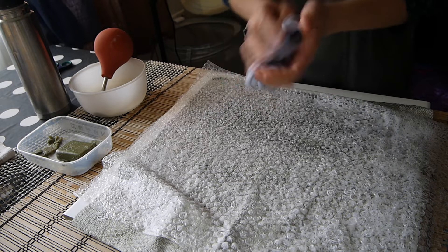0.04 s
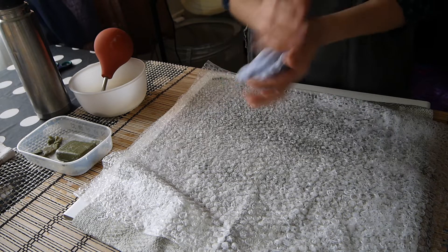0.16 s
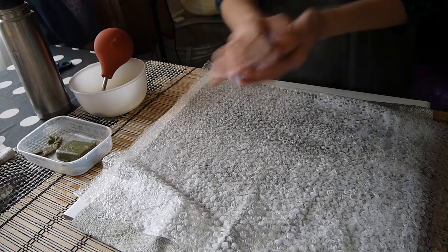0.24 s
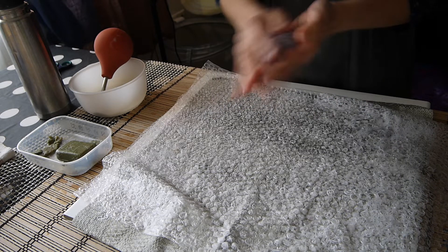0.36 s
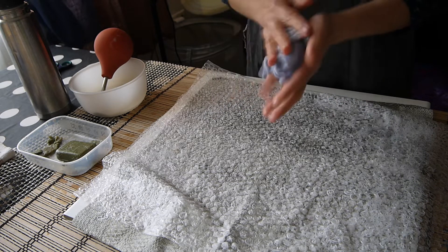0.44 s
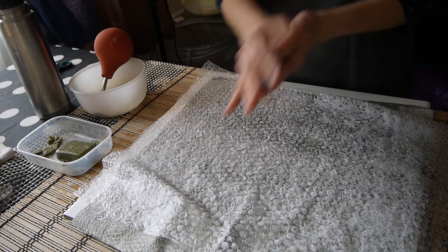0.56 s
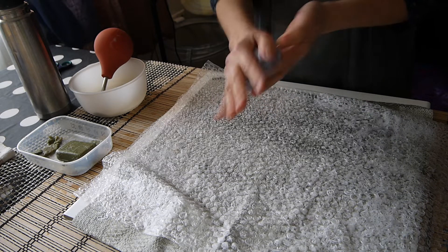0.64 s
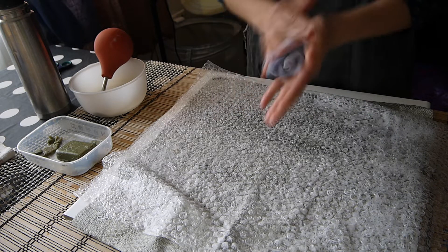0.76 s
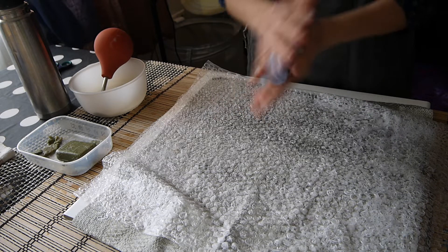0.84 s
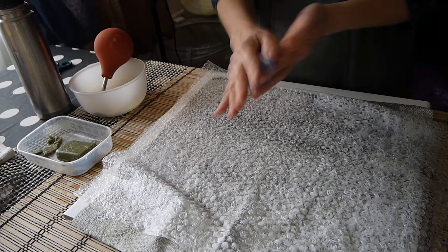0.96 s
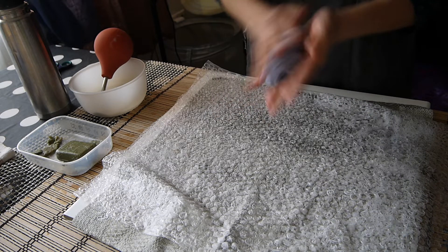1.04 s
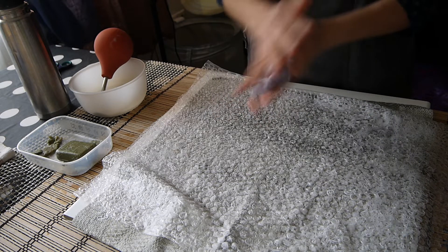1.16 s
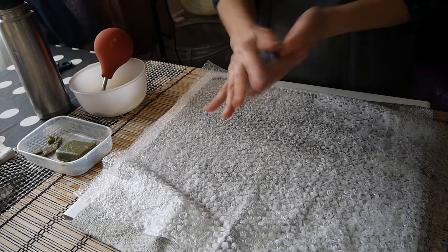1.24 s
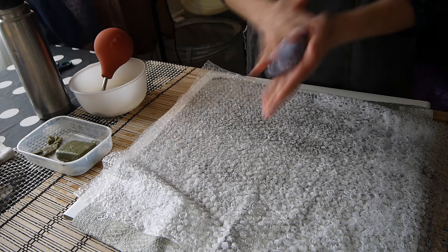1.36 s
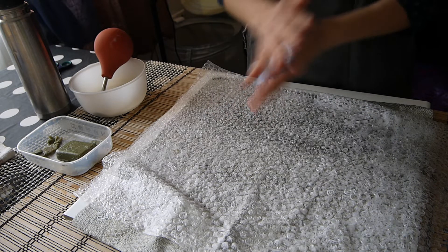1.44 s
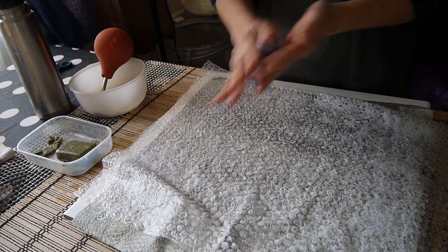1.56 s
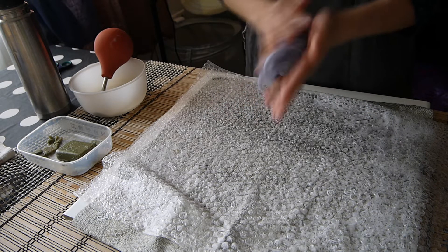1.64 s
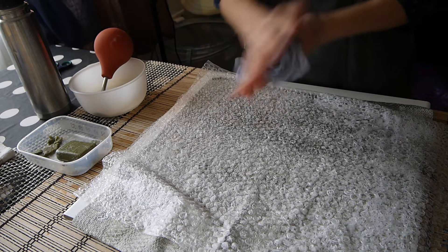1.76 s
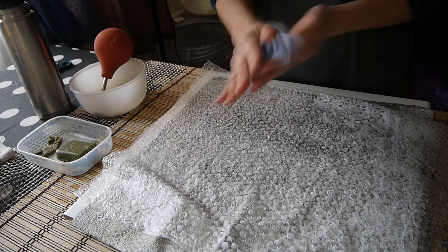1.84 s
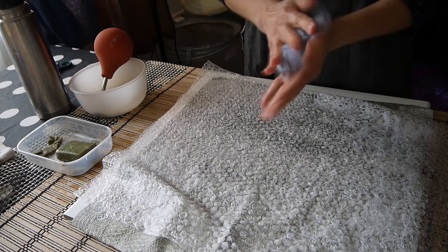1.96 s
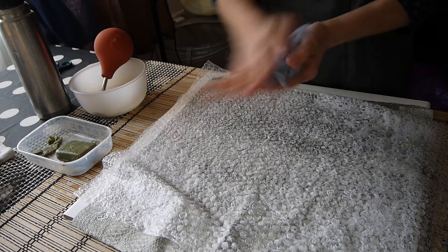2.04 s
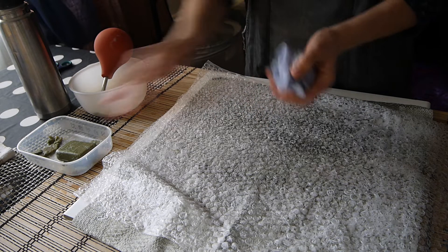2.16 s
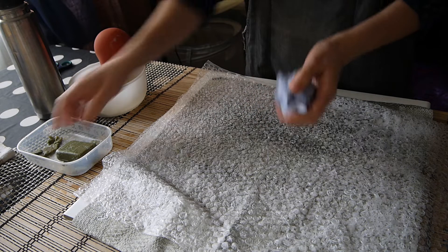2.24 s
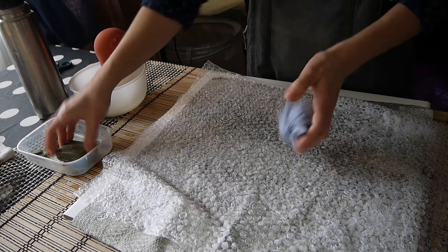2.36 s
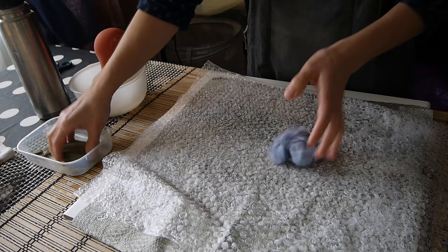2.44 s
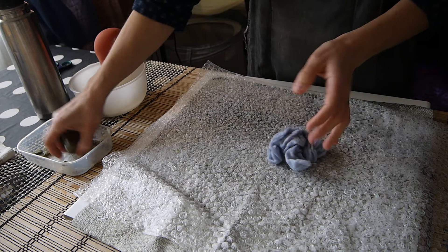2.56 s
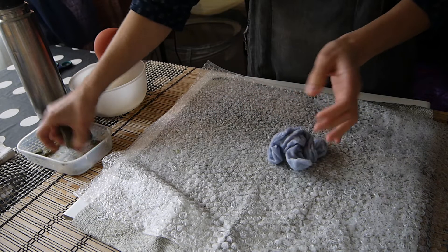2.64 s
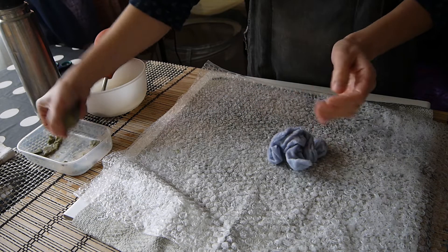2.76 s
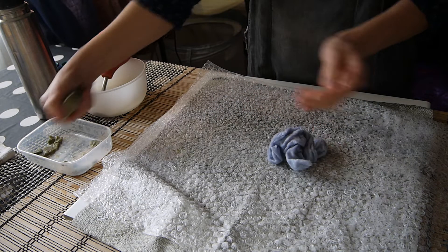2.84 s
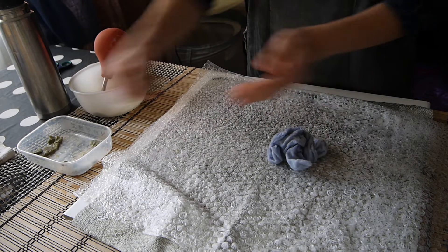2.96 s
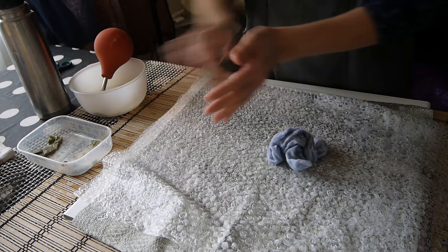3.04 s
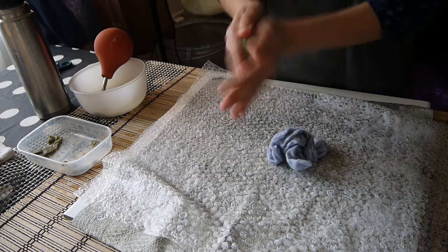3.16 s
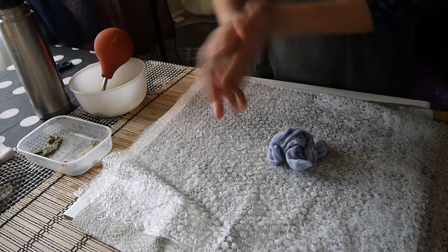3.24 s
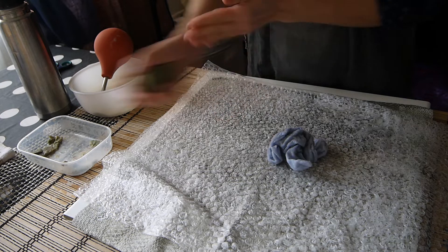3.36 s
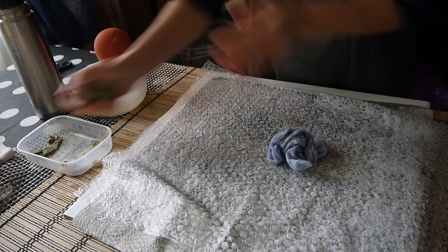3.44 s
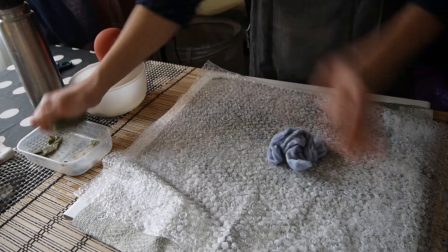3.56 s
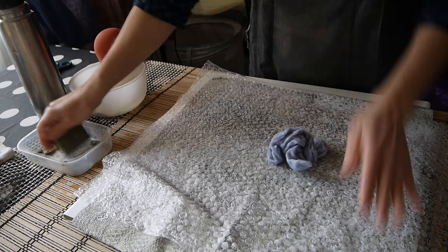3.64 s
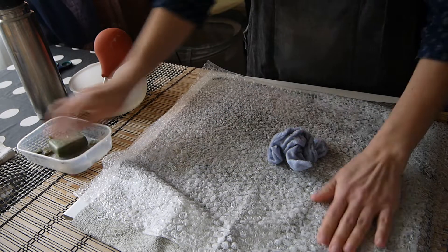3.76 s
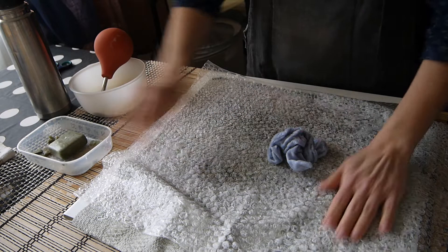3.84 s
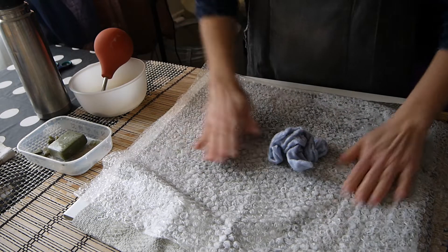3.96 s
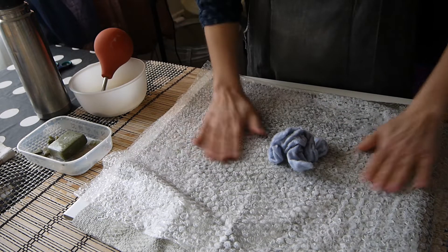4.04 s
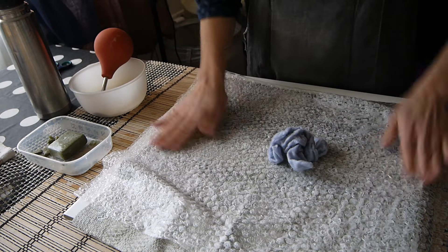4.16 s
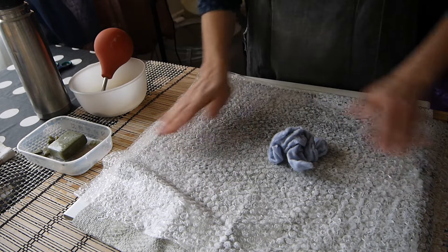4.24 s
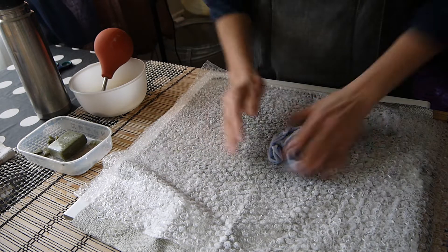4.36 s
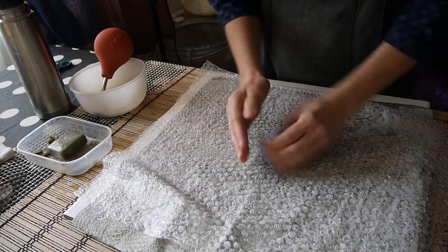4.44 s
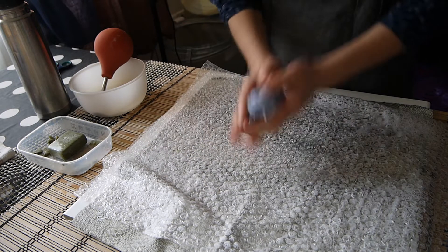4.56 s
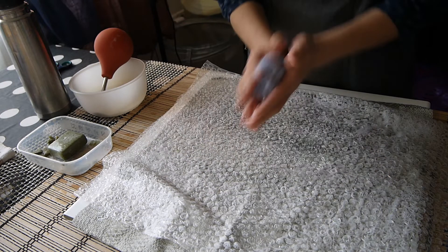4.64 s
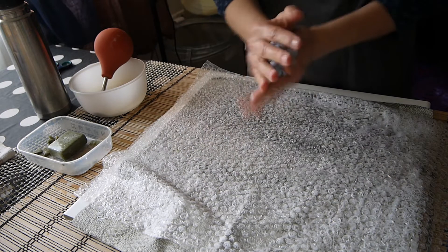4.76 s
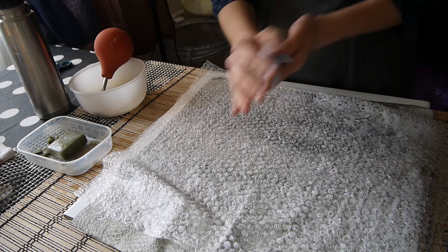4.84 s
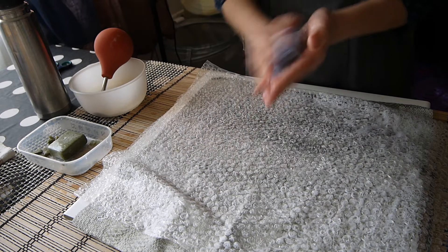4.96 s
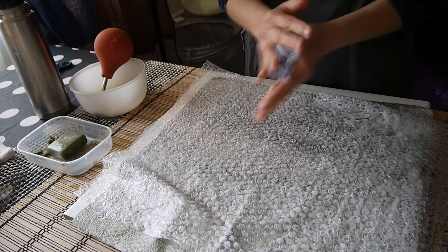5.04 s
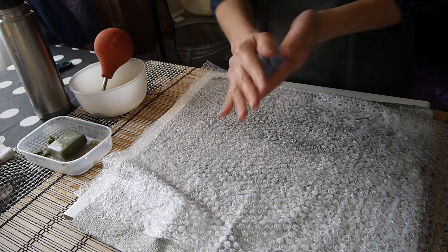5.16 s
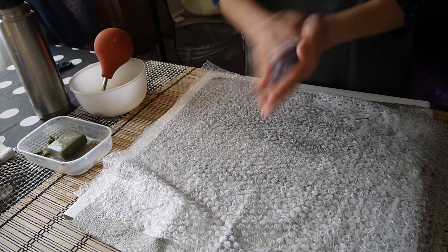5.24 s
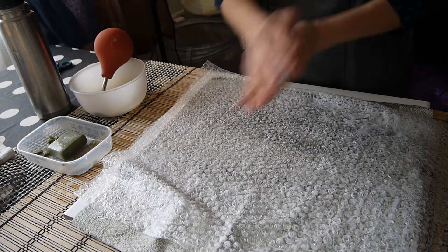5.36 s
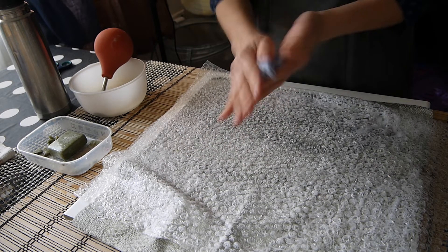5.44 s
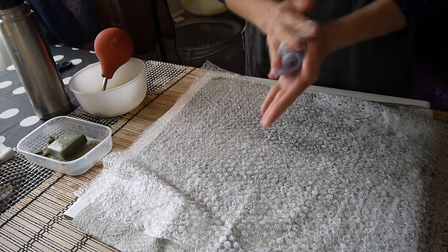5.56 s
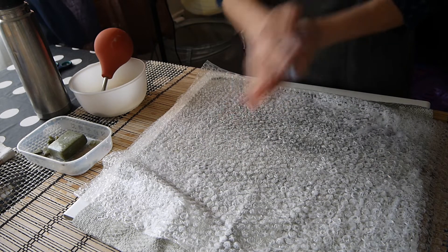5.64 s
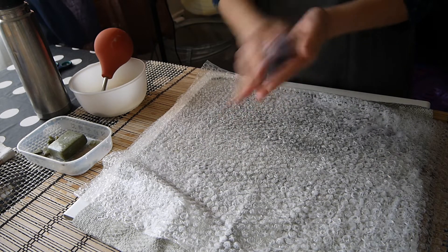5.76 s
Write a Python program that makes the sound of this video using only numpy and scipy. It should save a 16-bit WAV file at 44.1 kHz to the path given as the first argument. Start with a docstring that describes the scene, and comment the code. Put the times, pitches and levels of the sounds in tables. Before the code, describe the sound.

From the start until about 2.1 seconds, palms roll wet, soapy wool close by in the centre: a soft foamy hiss in about six strokes a second, with small squelches. A wet tap follows near 2.3 seconds. From 2.4 to 2.8, a bar of soap scrapes and knocks lightly in a plastic dish on the left. Quiet lathering with a few wet smacks runs from 3 to 3.6 seconds. At 3.7 the bar drops back with a sharp, bouncing clatter and low table thuds, by far the loudest event, over by 3.9. From 4 to 4.6 seconds, hands press and wipe bubble wrap, giving two brief crinkling swishes and soft bumps. The wool rubbing returns around 4.5 seconds, its strokes and squelches continuing to the end near 6 seconds. Steady microphone hiss and a faint distant rumble lie underneath, in a quiet room with little echo.

```python
"""Wet wool and a soap dish, close up

At a table in a quiet room, near a stereo pair of microphones, hands roll a soapy wool ball that hisses and
squelches, and put it on bubble wrap. They lift a bar of soap from a plastic dish on the left, lather, and
drop it back: the dish clatters and the table thuds. They press the wrap flat and take up the wool again.
Far room rumble and microphone hiss lie under everything."""
import sys
import numpy as np
from scipy import signal
from scipy.fft import rfft, irfft, next_fast_len
from scipy.io import wavfile

SR = 44100
rng = np.random.default_rng(int(sys.argv[2]) if len(sys.argv) > 2 else 0)


def bounce(signal):
    """Save signal as a 16-bit WAV file at the path given by the first command-line argument."""
    frames = np.transpose(np.atleast_2d(signal))
    limited = np.clip(frames, -1, 1)
    pcm = np.round(limited * 32767).astype(np.int16)
    wavfile.write(sys.argv[1], SR, pcm)


N = 255339

# palms roll the wool to and fro, one row a stroke: (middle [s], length [s], level [dB])
PALM_STROKES = [(0.0, 0.11, -56), (0.107, 0.17, -56), (.26, 0.13, -57.5), (0.424, 0.16, -54.5),
                (.6, 0.13, -55), (0.767, 0.19, -55.5), (0.907, 0.15, -55.5), (1.078, .18, -58),
                (1.225, 0.17, -57.5), (1.363, 0.26, -59.5), (1.504, 0.14, -54.5), (1.68, .13, -55.5),
                (1.84, 0.26, -55.5), (1.98, 0.12, -60), (2.102, 0.081, -59), (4.837, .24, -56),
                (5.027, 0.33, -58), (5.158, 0.16, -56.5), (5.283, 0.25, -58), (5.414, 0.14, -53),
                (5.568, 0.17, -55), (5.712, 0.19, -52.5)]
# wool between the palms keeps hissing at the turns: (start [s], end [s], closing time [s])
WOOL_HOLDS = [(-.1, 2.13, .02), (4.5, 7, 0.23)]
# two spells, lathering the bar and letting it slip: (time [s], level [dB])
LATHER_SPELLS = [
    [(2.97, -75), (2.98, -64), (3.082, -63.5), (3.09, -49), (3.182, -65), (3.208, -53), (3.37, -57),
     (3.4, -67), (3.635, -74)],
    [(3.636, -76), (3.642, -62), (3.69, -58)],
]
STROKE_SHARPNESS = 1.16   # power of the sliding speed that the hiss follows
HOLD_DB, PARTING_S = -58.5, 0.029


def sliding():
    """Gain of the hiss: sliding speed is half a sine in each stroke, over a steady contact."""
    t = np.arange(N) / SR
    power = gains(LATHER_SPELLS)[0] ** 2
    for s, length, db in PALM_STROKES:
        speed = np.cos(np.pi * np.clip((t - s) / length, -.5, .5))
        power += (from_db(db) * np.abs(speed) ** STROKE_SHARPNESS) ** 2
    for start, end, closing in WOOL_HOLDS:
        contact = np.interp(t, [start, start + closing, end, end + PARTING_S], [0, 1, 1, 0])
        power += (from_db(HOLD_DB) * contact) ** 2
    return np.sqrt(power)


# soapy hiss from close by: (frequency [Hz], relative density [dB])
FOAM_SPECTRUM = [(180, -86), (300, -8), (326, 2), (397, -9.5), (821, -9), (907, -12), (2980, -13.5),
                 (3600, -16), (4200, -12), (4950, -9.5), (6360, -13.5), (9930, -10.5), (11500, -15),
                 (15500, -38.5)]
# the hands across the two microphones: (frequency [Hz], left-right likeness [-1..1])
HAND_LIKENESS = [(300, 1), (3000, 0.78), (7000, 0.68), (15000, 0.66)]


def rubbing():
    """Centre, close: soap film shears with a hiss in which tiny foam bubbles pop."""
    foam = rng.standard_normal((2, N)) + 0.35 * grains(per_s=2500, spread_db=2.3, channels=2)
    return sliding() * wide(foam, FOAM_SPECTRUM, HAND_LIKENESS)


# wool squeezed between the palms: (middle [s], level [dB], pitch [Hz], length [s])
WOOL_SQUELCHES = [(0.104, -56, 1180, 0.026), (0.195, -55, 493, 0.035), (0.767, -55, 198, .05),
                  (1.228, -56, 1370, 0.074), (1.51, -52.5, 1770, 0.027), (1.754, -71, 158, 0.063),
                  (1.807, -50.5, 1190, 0.049), (2.08, -58, 720, 0.13), (4.851, -59, 1200, 0.051),
                  (5.045, -55.5, 900, 0.049), (5.173, -57, 510, 0.046), (5.408, -56.5, 810, 0.094),
                  (5.691, -56.5, 724, 0.09)]


def squelches():
    """Water and air pressed through wool: soft swells about two octaves wide."""
    out = np.zeros(N)
    for s, db, hz, length in WOOL_SQUELCHES:
        size = int(length * SR)
        band = filtered(rng.standard_normal(size), "band", [hz / 3.4, hz * 1.41])
        add(out, s - length / 2, from_db(db) * rms_one(band) * np.hanning(size))
    return out


# wet contacts in the centre: (time [s], peak [dB], band centre [Hz], t60 [s])
WET_SMACKS = [(2.26, -40, 570, 0.038), (2.26, -37, 4660, 0.011), (2.894, -44, 8300, 0.0079),
              (2.98, -56, 7000, .01), (3.09, -37, 493, 0.15), (3.089, -39, 9000, 0.015),
              (3.104, -41.5, 2970, .01), (3.21, -40.5, 4030, 0.009), (3.242, -41, 2540, 0.008),
              (3.644, -51, 3970, 0.017), (3.798, -32, 9400, .03), (3.865, -32, 9400, 0.014),
              (3.874, -32, 10000, .012), (3.885, -25, 9500, 0.012), (3.895, -26, 9500, 0.017),
              (4.43, -46.5, 680, 0.13), (4.501, -41, 5000, .02), (5.513, -42, 7000, .01),
              (5.677, -34, 8000, 0.02)]


def smacks():
    """Wet skin, wool and soap smack together, each a puff about an octave wide."""
    out = np.zeros(N)
    for s, db, hz, t60 in WET_SMACKS:
        add(out, s, from_db(db) * burst(t60, hz / 1.45, hz * 1.45))
    return out


# modes of the plastic dish: (frequency [Hz], relative level [dB], t60 [s])
DISH_MODES = [(368, -2.5, 0.029), (462, 7.5, 0.02), (657, -13, 0.042), (765, -7, 0.032), (1070, -6, 0.031),
              (888, -1, .055), (1122, 1, .06), (1350, 0, .05), (1620, -1, 0.02), (1780, -14, 0.022),
              (1930, -4.5, 0.041), (2007, -11.5, 0.033), (2129, -0.5, 0.026), (2355, -0.5, 0.022),
              (2650, 6.5, 0.0067), (3170, 13.5, 0.0054), (4110, 12.5, 0.0052), (4900, -17.5, 0.00367),
              (5900, -15, 0.0046)]
# bar on dish: (time [s], peak before panning [dB], contact t60 [s], favoured pitch [Hz], relative snap [dB])
BAR_KNOCKS = [(2.4215, -34, 0.003, 970, -14), (2.46, -39, 0.0034, 1500, -4),
              (2.475, -28.5, 0.0013, 1390, -9), (2.504, -34.5, 0.017, 1650, -7),
              (2.574, -40, 0.016, 1690, -7), (2.589, -31.5, .014, 1400, -8.5),
              (2.6729, -21, 0.0014, 1250, -9), (2.677, -23, 0.0054, 1500, -33),
              (2.697, -32.5, 0.042, 1150, -23), (2.709, -28, 0.014, 1400, -23),
              (2.735, -25, 0.019, 1500, -26), (3.6952, -2, .002, 2000, -4), (3.698, -7, 0.0027, 1800, -10),
              (3.71, -22, 0.0028, 1210, -13), (3.718, -34, 0.015, 900, -13),
              (3.7905, -8.5, 0.02, 1010, -21), (3.798, -8, 0.008, 1250, -13),
              (3.86, -18.5, 0.011, 1800, -7), (3.865, -8, 0.021, 2050, -20),
              (3.882, -23.5, 0.033, 1530, -8), (3.894, -17, 0.0043, 1620, -2)]


def knocks():
    """Each blow of the bar lands on another spot of the dish and favours other modes; a snap leads it."""
    out = np.zeros(N)
    for s, db, contact, hz, snap_db in BAR_KNOCKS:
        modes = [(f, level_db - 53 * np.log2(f / hz) ** 2 + rng.normal(0, 1.44), t60)
                 for f, level_db, t60 in DISH_MODES]
        force = burst(contact, 126, 4000)
        force[:3] += .8   # the first touch is the hardest
        body = cut_bass(ring(force, modes), 0.29 * hz)   # a small dish radiates no bass
        snap = from_db(snap_db) * burst(0.0072, 4250, 7400)
        add(out, s, from_db(db) * (peak_one(body) + snap))
    return out


# each jolt of bar and dish leaves a chatter until the next: (time [s], jolt [dB], chatter [dB],
# chatter fade [dB/s], relative wet treble [dB], further fade of the treble [dB/s])
BAR_JOLTS = [(2.42, -60, -50.5, 5, -13, 5), (2.45, -48, -47, 5, -10, 5), (2.473, -37, -44, 61, -11, 190),
             (2.578, -41, -40.5, 240, -12, 150), (2.672, -28.5, -37.5, 150, -32, 5),
             (2.733, -44, -37.5, 288, -25, 5), (3.698, -16.5, -28.5, 13, -8, 130),
             (3.792, -16.5, -25.5, 8, -9, 250), (3.865, -39, -23, 145, -7, 42)]
JOLT_HOLD_S, JOLT_FADE_DB_PER_S = .002, 1500


def chatter():
    """Gains of scrape and wet treble: a short jolt on a fading chatter; the treble dies sooner."""
    t, rows = np.arange(N) / SR, np.array(BAR_JOLTS)
    last = np.searchsorted(rows[:, 0], t) - 1
    s, jolt_db, chatter_db, fade, wet_db, wet_fade = rows[last].T
    age = np.abs(t - s)
    jolt = from_db(jolt_db - JOLT_FADE_DB_PER_S * np.maximum(age - JOLT_HOLD_S, 0))
    skid = (last >= 0) * np.hypot(jolt, from_db(chatter_db - fade * age))
    return skid, skid * from_db(wet_db - wet_fade * age)


# scrape of the held bar, of the loose bar, and their wet film: (frequency [Hz], relative density [dB])
HELD_SPECTRUM = [(180, -42), (300, -1.5), (775, 0), (896, -13), (1280, 2), (1380, 1), (1540, -6), (1750, 0),
                 (7000, -58), (9100, -65), (15400, -120)]
LOOSE_SPECTRUM = [(180, -10), (300, 7), (603, -34), (884, -1.5), (1600, 9), (1850, 4.5), (2970, -0.5),
                  (5170, -4), (7000, -14), (9100, -50), (15400, -120)]
SPRAY_SPECTRUM = [(1760, -24), (3000, -12.5), (5160, -6.5), (6700, -17.5), (9520, -9), (12300, -16.5),
                  (13800, -33), (15500, -45)]
# the dish across the two microphones: (frequency [Hz], left-right likeness [-1..1])
SCRAPE_LIKENESS = [(60, 0.76), (180, 1), (550, 1), (1650, 0.46), (4970, 1), (15000, 0.37)]
DROP_S = 3.3   # the bar scrapes as held before this, as loose after


def skidding():
    """The bar skids in dense contacts, partly ringing in the dish; the wet film adds treble."""
    skid, wet = chatter()
    held = np.arange(N) / SR < DROP_S
    contacts = grains(per_s=4000, spread_db=0.72, channels=2)
    soft_contacts = signal.lfilter([.3], [1, -.7], contacts[0])
    ringing = rms_one(filtered(ring(soft_contacts, DISH_MODES), "high", 510))
    gripped = filtered(ringing, "high", 950)   # a gripped dish loses its low modes
    body = np.where(held, 0.47 * gripped, .5 * ringing)
    scrape = np.where(held, wide(contacts, HELD_SPECTRUM, SCRAPE_LIKENESS),
                      wide(contacts, LOOSE_SPECTRUM, SCRAPE_LIKENESS))
    spray = wide(grains(per_s=4600, spread_db=2.6, channels=2), SPRAY_SPECTRUM, SCRAPE_LIKENESS)
    return skid * (body + 0.54 * scrape) + wet * spray


# two spells of pressing and wiping the bubble wrap: (time [s], crinkle [dB], relative table push [dB])
WRAP_PRESSES = [
    [(4.0, -49, -65), (4.022, -47, -65), (4.062, -43, -29), (4.108, -43, -42), (4.126, -42, -32.5),
     (4.17, -38, -35.5), (4.222, -48, -41), (4.3, -64, -83)],
    [(4.41, -79, -71), (4.43, -50.5, -57), (4.446, -52, -42), (4.484, -54.5, -47.5), (4.574, -63.5, -55),
     (4.58, -58, -76)],
]
# the film from close by: (frequency [Hz], relative density [dB])
WRAP_SPECTRUM = [(350, -18), (600, -21.5), (820, 1), (915, -20.5), (1010, -5), (1340, -12), (2340, -7),
                 (9240, -12.5), (10900, -14.5), (15500, -41)]


def bubble_wrap():
    """Centre, close: palms swish over the plastic film, which crinkles finely."""
    crinkle = rng.standard_normal((2, N)) + 0.81 * grains(per_s=4000, spread_db=1.7, channels=2)
    return gains(WRAP_PRESSES)[0] * wide(crinkle, WRAP_SPECTRUM, HAND_LIKENESS)


# modes of the table under the hands: (frequency [Hz], relative level [dB], t60 [s])
TABLE_MODES = [(109, -1, 0.3), (173.7, -2, 0.072), (224, 6.5, 0.031), (341, 2.5, 0.092), (408, -0.5, 0.044),
               (510, -4.5, 0.042), (830, -14, 0.025)]
# blows passed into the table: (time [s], peak before the bass cut [dB])
TABLE_THUDS = [(2.262, -59), (2.425, -38), (2.472, -37.5), (2.724, -34.5), (3.089, -35), (3.697, -23),
               (3.719, -15.5), (3.798, -16.5), (3.868, -32), (4.057, -32), (4.068, -34), (4.086, -36),
               (4.107, -37), (4.44, -37)]
PALM_CUT_HZ, PUSH_GAIN_DB = 210, -52   # a soft palm pushes with little treble


def table():
    """Uneven pushes of the hands and blows on top set the table's low modes going."""
    push = rms_one(filtered(grains(per_s=1500, spread_db=1.4)[0], "low", PALM_CUT_HZ, order=1))
    out = ring(gains(WRAP_PRESSES)[1] * from_db(PUSH_GAIN_DB) * push, TABLE_MODES)
    for s, db in TABLE_THUDS:
        thud = ring(burst(0.0038, 65, 590), TABLE_MODES)
        add(out, s, from_db(db) * peak_one(thud))
    return cut_bass(out, 93)


ROOM_T60_S, WALL_CUT_HZ, ECHO_GAIN_DB = 0.38, 12600, -15.5


def room(x):
    """Wall echoes: eight feedback delays a side, duller on every round; lows reach both sides alike."""
    size = next_fast_len(N + SR)
    delay = np.exp(-2j * np.pi * np.arange(size // 2 + 1) / size)   # by one sample
    pole = np.exp(-2 * np.pi * WALL_CUT_HZ / SR)
    wall = (1 - pole) / (1 - pole * delay)
    response = np.zeros((2, len(delay)), complex)
    for k, lag in enumerate((rng.uniform(.008, .03, 16) * SR).astype(int)):
        loop = from_db(-60 * lag / SR / ROOM_T60_S) * wall * delay ** lag
        response[k % 2] += (-1) ** (k // 2) * loop / (1 - loop)
    left, right = from_db(ECHO_GAIN_DB) * irfft(response * rfft(x, size), size)[:, :N]
    mid = (left + right) / 2
    side = filtered(left - right, "high", 600, order=1) / 2
    return np.array([mid + side, mid - side])


# swells of rumble, far from the microphones: (time of the top [s], level [dB])
RUMBLE_SWELLS = [(0.0, -63), (.68, -65.5), (1.8, -59.5), (2.58, -61), (3.66, -72), (4.08, -62), (5.79, -97)]
RISE_DB_PER_S, FALL_DB_PER_S = 37, 74


def rumble():
    """Distant low noise rises to each top and sinks again."""
    s, top_db = np.transpose(RUMBLE_SWELLS)[:, :, None]
    age = np.arange(N) / SR - s
    swells_db = top_db - np.where(age < 0, -RISE_DB_PER_S * age, FALL_DB_PER_S * age)
    low = filtered(rng.standard_normal(N), "band", [70, 190])
    return from_db(swells_db.max(axis=0)) * rms_one(low)


# the quiet room and the microphones' own hiss: (frequency [Hz], relative density [dB])
TONE_SPECTRUM = [(24, -36), (40, -18.5), (66, -21), (261, -9.5), (327, -13), (442, -10), (643, -10),
                 (710, -10), (983, -10.5), (1580, -14), (1790, -18), (3190, -26.5), (3610, -27.5),
                 (3990, -26.5), (15800, -39)]
# that noise across the two microphones: (frequency [Hz], left-right likeness [-1..1])
TONE_LIKENESS = [(60, -0.12), (130, 0.91), (290, 0.069), (640, -0.65), (1410, -0.88), (3100, -0.55),
                 (6820, 0.01), (15000, 0.34)]
TONE_DB = -51


def room_tone():
    """Steady room noise and microphone hiss, spread wide."""
    return from_db(TONE_DB) * wide(rng.standard_normal((2, N)), TONE_SPECTRUM, TONE_LIKENESS)


def from_db(db):
    """Decibels to gain."""
    return 10 ** (np.asarray(db) / 20)


def rms_one(x):
    """Scale to unit rms."""
    return x / np.sqrt(np.mean(x ** 2) + 1e-20)


def peak_one(x):
    """Scale to unit peak."""
    return x / np.abs(x).max()


def filtered(x, kind, hz, order=2):
    """Low, high or band pass."""
    return signal.sosfilt(signal.butter(order, hz, kind, fs=SR, output="sos"), x)


def cut_bass(x, hz):
    """Steep low cut: two high passes in a row."""
    return filtered(filtered(x, "high", hz), "high", hz)


def gains(spells):
    """One gain curve for each level column, silent between the spells."""
    t, out = np.arange(N) / SR, 0
    for rows in spells:
        s, *columns = np.transpose(rows)
        out = out + from_db([np.interp(t, s, db, left=-200, right=-200) for db in columns])
    return out


def at_hz(points, hz):
    """Read a table on a log-frequency axis."""
    frequencies, values = np.transpose(points)
    return np.interp(np.log(hz), np.log(frequencies), values)


def wide(source, spectrum, likeness):
    """Two unrelated signals, shaped by a spectrum, become mid and side by their likeness; rms 1."""
    hz = np.maximum(np.fft.rfftfreq(N + 1, 1 / SR), 1)
    alike = at_hz(likeness, hz)
    shape = from_db(at_hz(spectrum, hz)) * np.sqrt([1 + alike, 1 - alike])
    mid, side = irfft(rfft(source, N + 1) * shape, N + 1)[:, :N]
    return rms_one(np.array([mid + side, mid - side]))


def grains(per_s, spread_db, channels=1):
    """Random clicks of uneven size and sign; rms 1."""
    shape = (channels, N)
    sizes = from_db(spread_db * np.minimum(rng.exponential(1, shape), 4)) * rng.standard_normal(shape)
    return rms_one(sizes * (rng.random(shape) < per_s / SR))


def ring(force, modes):
    """A force sets decaying modes ringing."""
    out = 0
    for hz, level_db, t60 in modes:
        decay, angle = from_db(-60 / (t60 * SR)), 2 * np.pi * hz / SR
        feedback = [1, -2 * decay * np.cos(angle), decay ** 2]
        out = out + from_db(level_db) * signal.lfilter([0, np.sin(angle)], feedback, force + 1e-18)
    return out


def burst(t60, low_hz, high_hz):
    """A short dying puff of band noise with peak 1."""
    noise = rng.standard_normal(4000) * from_db(-60 * np.arange(4000) / SR / t60)
    return peak_one(filtered(noise, "band", [low_hz, high_hz]))


def add(track, s, sound):
    """Mix a sound in at a time."""
    i = round(s * SR)
    track[i:i + len(sound)] += sound[:N - i]


def scene():
    """From the microphones: dish to the left, hands and table in the middle, the room all around."""
    blows, scrape = knocks(), skidding()
    dish = (blows + scrape) * from_db([[1.9], [-2.2]])
    middle = table() + smacks() + squelches()
    background = room_tone() + rumble()
    echoes = room(blows + scrape.mean(axis=0) + middle)
    return rubbing() + dish + middle + bubble_wrap() + echoes + background


CEILING, CUTOFF_HZ, DC_OFFSET = .9, 16300, -.003


def record(dry):
    """The left microphone is a little more sensitive; rounded peaks, a cut top, a small steady offset."""
    microphones = dry * from_db([[.2], [-.2]])
    rounded = CEILING * np.tanh(microphones / CEILING)
    top_cut = signal.cheby2(12, 70, CUTOFF_HZ, fs=SR, output="sos")
    return signal.sosfilt(top_cut, rounded) + DC_OFFSET


dry = scene()
out = record(dry)
bounce(out)
```